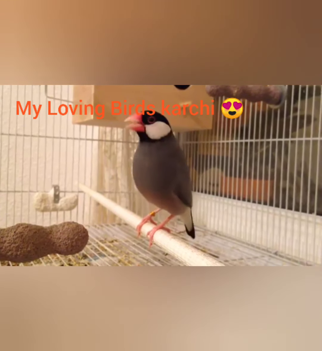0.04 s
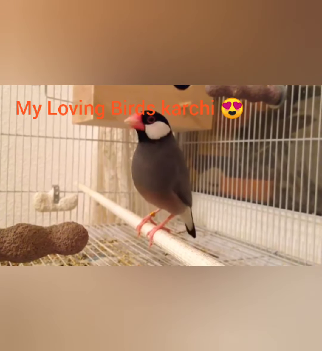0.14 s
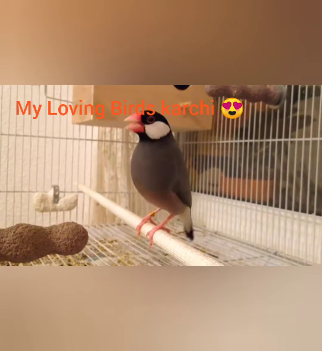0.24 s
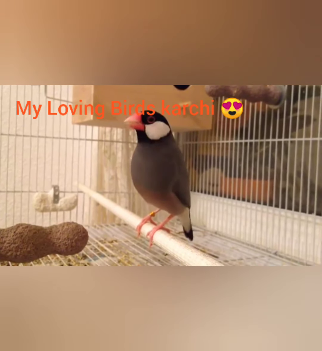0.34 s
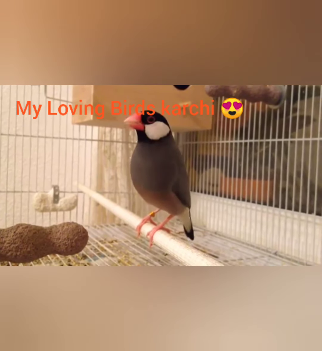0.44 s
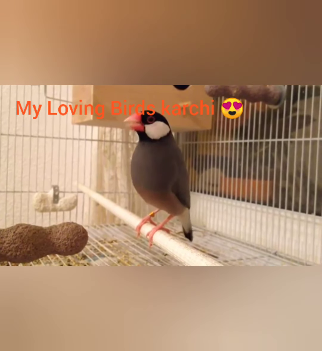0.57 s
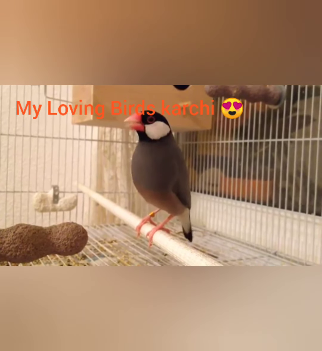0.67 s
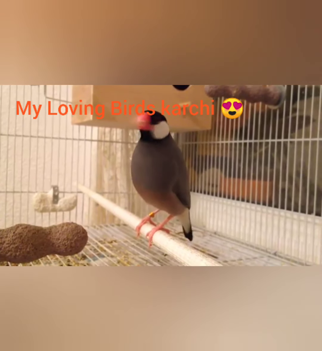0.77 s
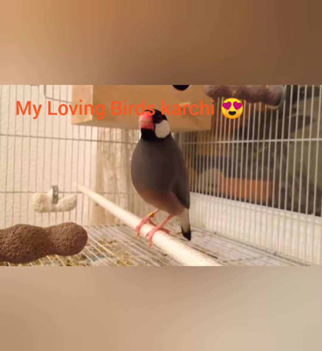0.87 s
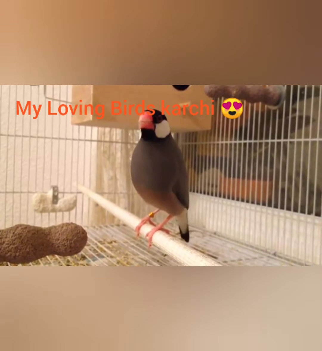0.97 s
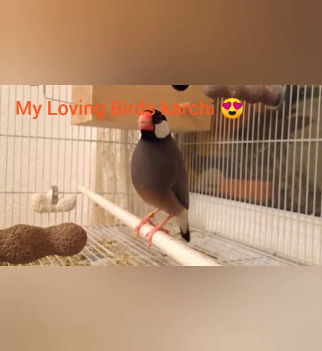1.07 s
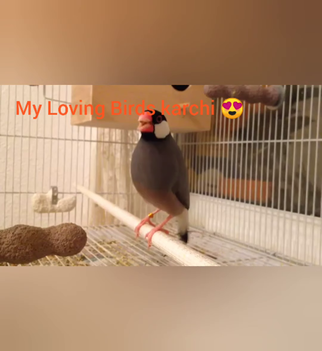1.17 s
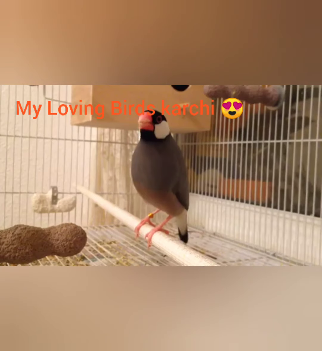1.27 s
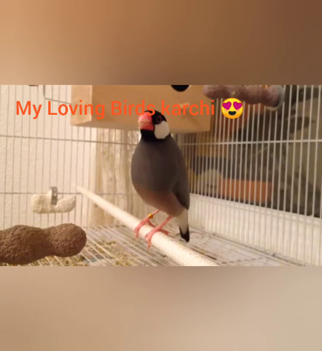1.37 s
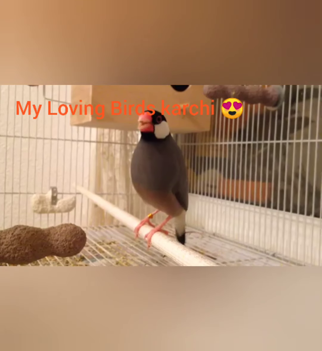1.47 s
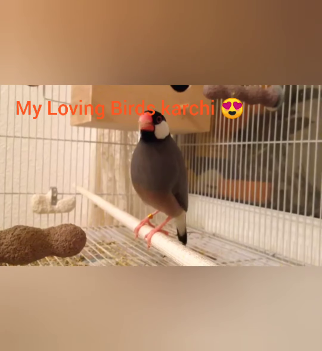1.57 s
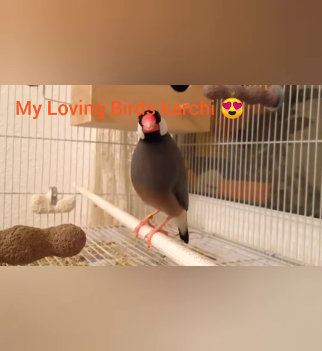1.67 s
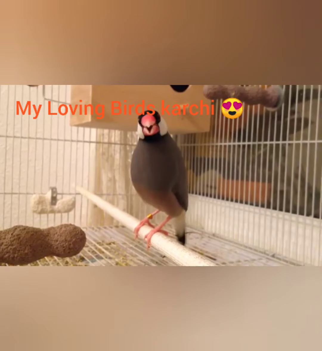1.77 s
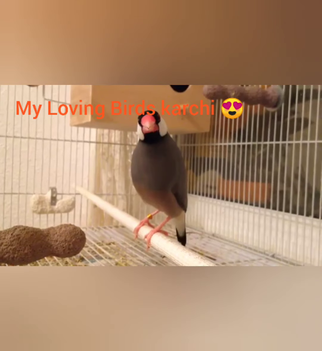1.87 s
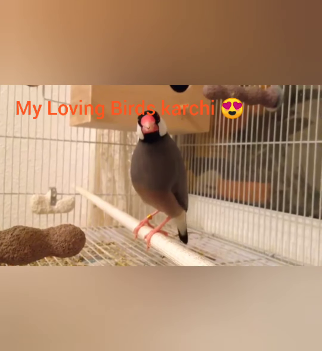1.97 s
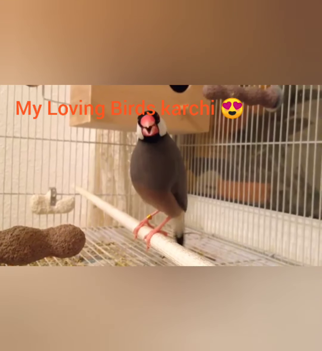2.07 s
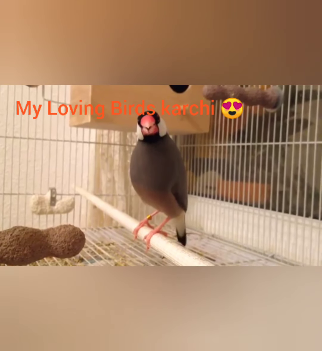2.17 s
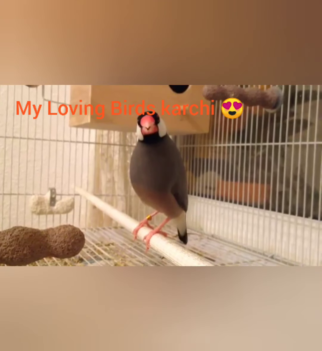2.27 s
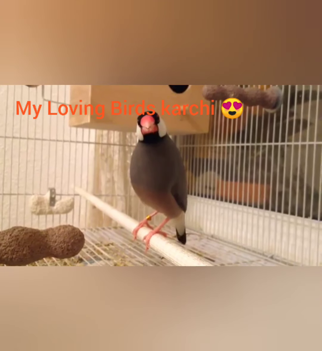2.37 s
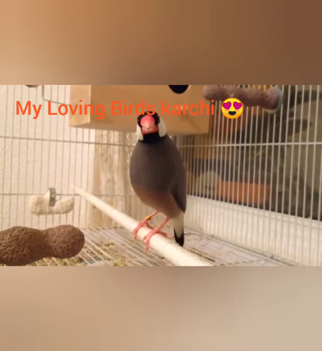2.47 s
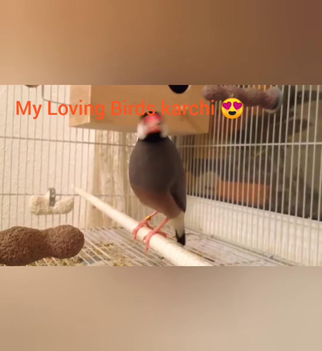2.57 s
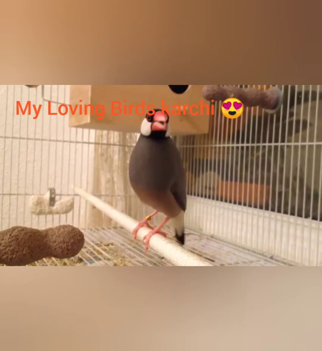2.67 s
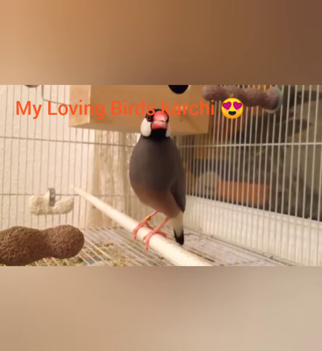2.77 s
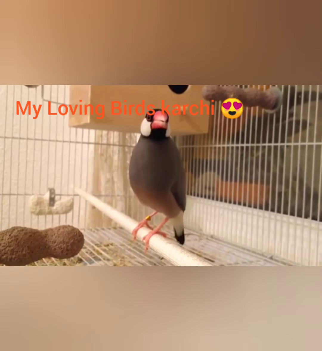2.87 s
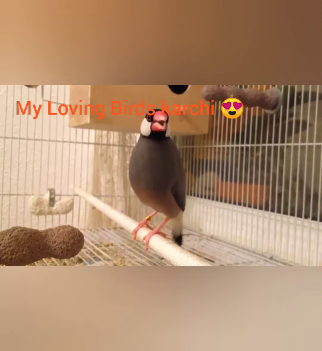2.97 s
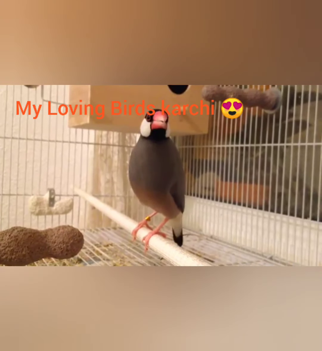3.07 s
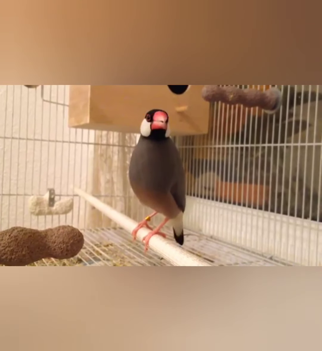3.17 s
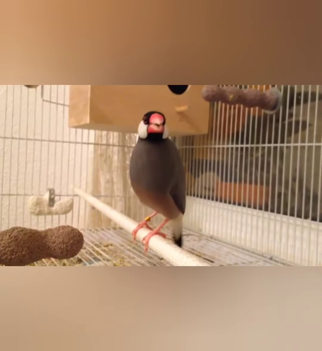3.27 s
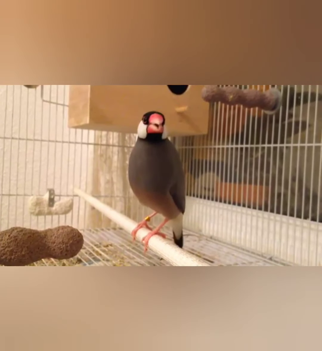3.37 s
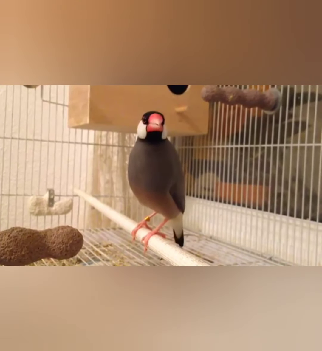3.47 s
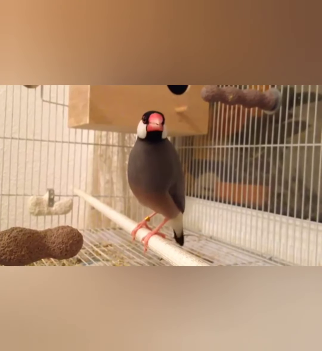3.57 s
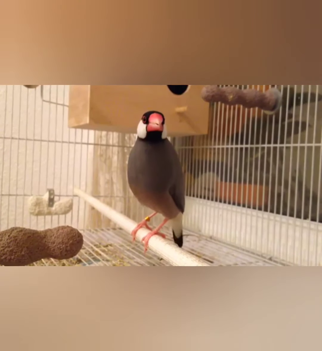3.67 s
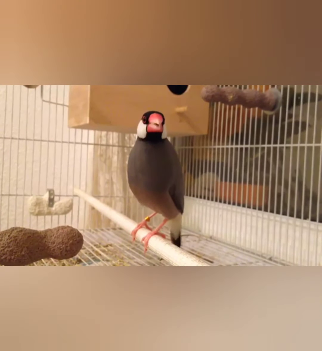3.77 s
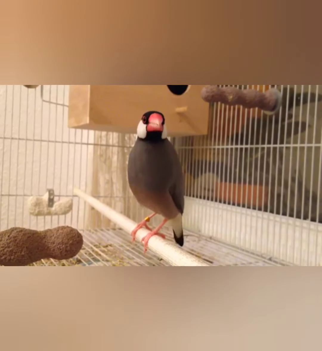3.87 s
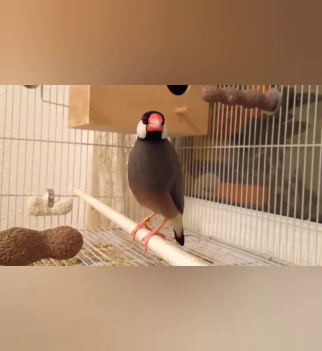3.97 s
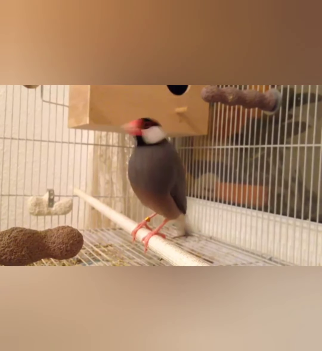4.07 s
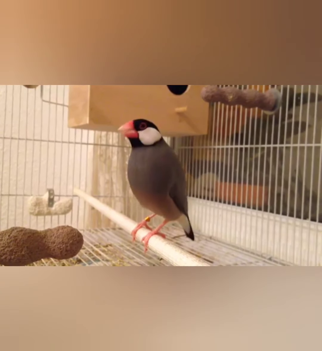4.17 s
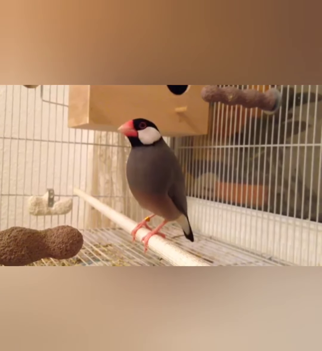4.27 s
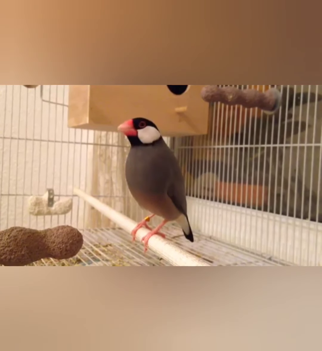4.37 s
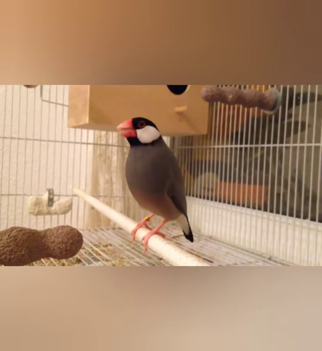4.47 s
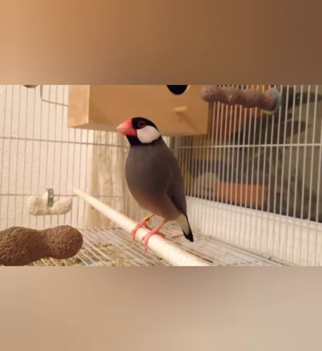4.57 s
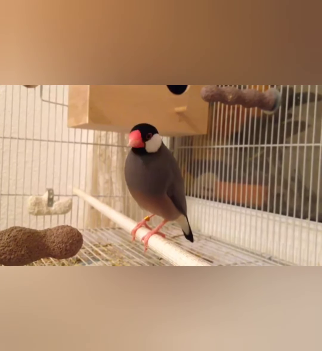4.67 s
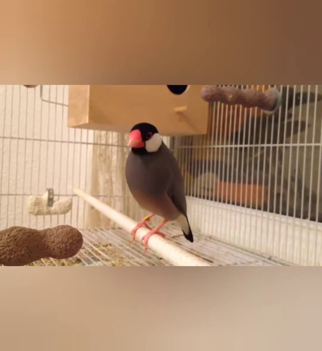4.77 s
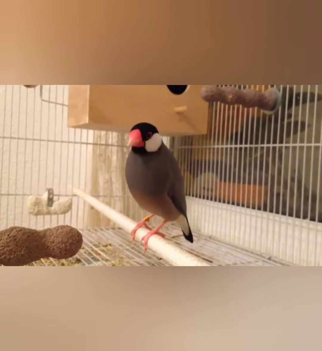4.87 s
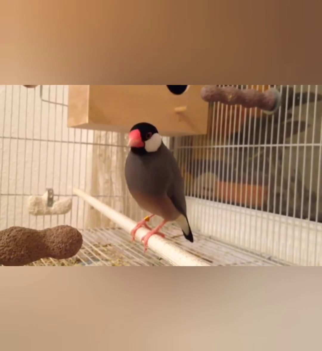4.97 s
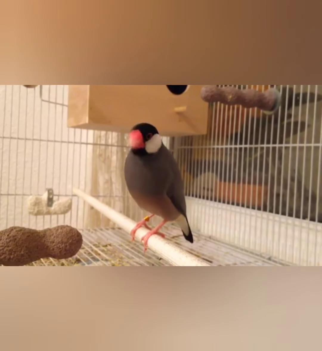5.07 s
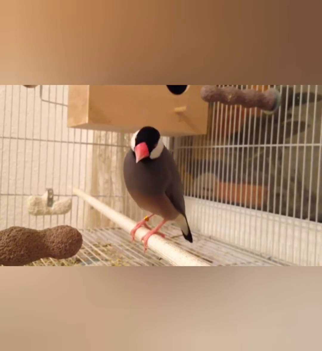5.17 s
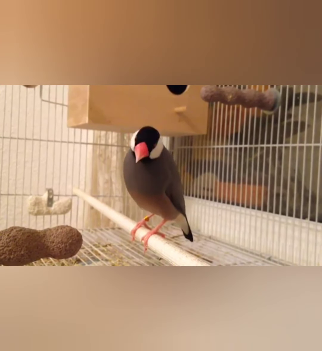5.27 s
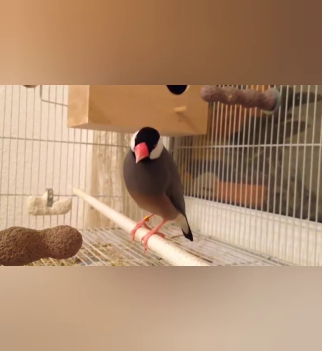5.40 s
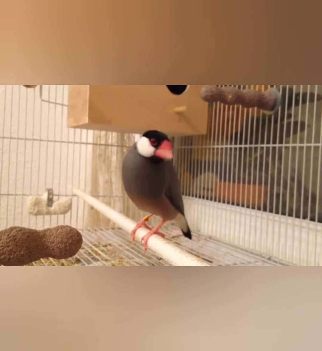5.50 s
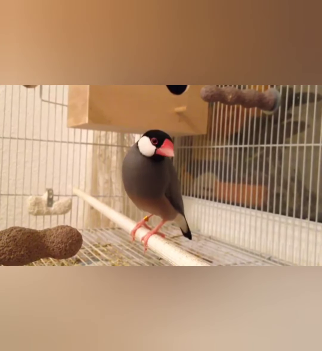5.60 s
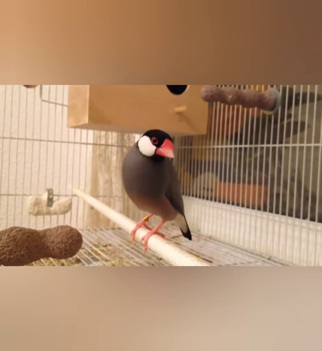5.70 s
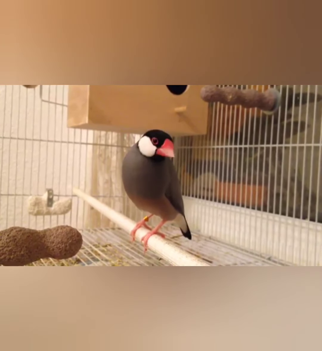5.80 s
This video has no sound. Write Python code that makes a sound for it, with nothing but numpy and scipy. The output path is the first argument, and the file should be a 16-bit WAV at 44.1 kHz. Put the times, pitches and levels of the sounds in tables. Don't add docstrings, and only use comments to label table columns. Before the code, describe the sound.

A small caged finch sings near a phone microphone in a bare room, its thin, nearly pure notes ringing on briefly. The tail of an earlier peep hangs at the very start. Chirps dive steeply at 0.1 and 0.35 seconds, each ending in a tiny breathy rattle and followed by a soft low cluck. A piercing held note comes at 0.6, a faint tumbling rattle at 0.74, a snappy chip at 0.9, then a quiet rising whistle and a bright peep at 1.1. The second phrase has three chirps from 1.27 to 1.85, a held note at 2.1, and chip, whistle and peep by 2.6. The third has chirps at 2.8 and 3.05, its loudest held note at 3.3, and a final whistle and peep around 3.8. Song then stops; steady hiss and faint low hum remain, with barely audible ticks near 4.2, 4.5 and 5.1.

```python
import sys
import numpy as np
from scipy import signal
from scipy.io import wavfile
from scipy.ndimage import uniform_filter1d

SR = 44100
rng = np.random.default_rng(int(sys.argv[2]) if len(sys.argv) > 2 else 0)


def generate_wav(sig):
    pcm = np.round(np.clip(np.atleast_2d(sig).T, -1, 1) * 32767).astype(np.int16)
    wavfile.write(sys.argv[1], SR, pcm)


def undo_db(level):
    steps = np.asarray(level, float) / 20
    return 10 ** steps


N = 257544
BEFORE = SR // 4


def evened(x):
    return x / np.sqrt(np.mean(x ** 2) + 1e-20)


def read(points, hz, column=1):
    table = np.transpose(points)
    return np.interp(np.log(hz + 1), np.log(table[0] + 1), table[column])


def add(mix, s, sound):
    part = mix[BEFORE + round(s * SR):][:len(sound)]
    part += sound[:len(part)]


def wobble(count, seconds):
    size = max(round(seconds * SR), 1)
    once = uniform_filter1d(rng.standard_normal(count), size)
    return evened(uniform_filter1d(once, size))


# [pitch_hz, second_db, third_db]
OVERTONES = [(2800, -43, -80), (3250, -42.5, -79), (3940, -51.5, -81.5), (3796, -44.5, -69),
             (4155, -39.5, -65.5), (4600, -38, -50), (5150, -33.5, -58)]
WARBLE_PER_S, WARBLE_DEPTH = 95, 0.023
DULL_HZ = 4000


def voice(rows, dull_hz=0):
    s, hz, level_db = np.transpose(rows)
    t = np.arange(s[0], s[-1], 1 / SR)
    hz = np.interp(t, s, hz) * (1 + .005 * wobble(len(t), .002))
    strain = np.clip((hz - 4650) / 300, 0, 1)
    hz *= 1 + WARBLE_DEPTH * strain * np.sin(2 * np.pi * WARBLE_PER_S * (t - s[0]))

    level_db = 20 * np.log10(uniform_filter1d(np.interp(t, s, undo_db(level_db)), size=60))
    level_db += 3.0 * strain * wobble(len(t), 0.0013)
    turn = 2 * np.pi * np.cumsum(hz) / SR
    second = undo_db(read(OVERTONES, hz, column=1)) * np.sin(2 * turn)
    third = undo_db(read(OVERTONES, hz, column=2)) * np.sin(3 * turn)
    unsteady = 1 + .35 * wobble(len(t), .0008)
    overtones = (second + third) * unsteady / (1 + (dull_hz / hz) ** 30)
    air = undo_db(-50) * (0.84 + strain) * wobble(len(t), 5 / SR) * np.cos(turn)
    tone = undo_db(level_db) * np.sin(turn) + undo_db(0.6 * level_db) * (overtones + air)
    return s[0], tone * signal.windows.tukey(len(t), .05)


SCOOP_S, SCOOP_DEPTH, LULL_S, LULL_DB = .006, .2, .022, -12
CLIMB, SWELL_SHARE, OVERSHOOT, WAVER_DB = .185, .8, .025, 3.5
# [start_s, length_s, pitch_hz, level_db]
WHISTLES = [
    (-.21, 0.13, 2850, -31),
    (0.981, .108, 2780, -36),
    (2.486, 0.1053, 2850, -30.5),
    (3.713, .108, 2836, -34),
]


def whistle(s, length, hz, level_db):
    t = np.linspace(0, length, num=30)
    climb = np.maximum(t - LULL_S, 0) / (length - LULL_S)
    scoop = SCOOP_DEPTH * np.maximum(1 - t / SCOOP_S, 0)
    overshoot = OVERSHOOT * np.exp(-((t - SCOOP_S) / SCOOP_S) ** 2)
    pitch = 1 - scoop + CLIMB * np.sin(climb * np.pi / 2.4) + overshoot
    corners_s = [0, SCOOP_S, LULL_S, SWELL_SHARE * length, length - SCOOP_S, length]
    effort_db = np.interp(t, corners_s, [-20, 0, LULL_DB, 0, 0, -20])
    effort_db += WAVER_DB * wobble(len(t), 2 / SR)
    return [voice(np.c_[s + t, hz * pitch, level_db + effort_db])]


JUMP_S, JUMP_DEPTH, JUMP_DB = .004, .08, -16.5
PEEP_S, SAG_HZ_PER_S, RELEASE_S = 0.028, 6000, .003
# [start_s, level_db, pitch_hz, attack_s, fade_db]
PEEPS = [
    (-.1, -9, 3780, 0.0085, -0.5),
    (1.097, -11.5, 3665, .004, -30),
    (2.594, -9, 3867, .009, -12.5),
    (3.822, -10.5, 3836, 0.0051, -5),
]


def peep(s, level_db, hz, attack, fade_db):
    t = np.array([-JUMP_S, 0, attack / 2, attack, PEEP_S, PEEP_S + RELEASE_S])
    below = JUMP_DEPTH * np.clip((attack / 2 - t) / (attack / 2 + JUMP_S), 0, 1)
    pitch_hz = hz * (1 - below) - SAG_HZ_PER_S * np.maximum(t - attack, 0)
    effort_db = np.array([2 * JUMP_DB, JUMP_DB, -3.0, 0, fade_db, 2 * JUMP_DB])
    return [voice(np.c_[s + t, pitch_hz, level_db + effort_db])]


CUT_HZ, CUT_DB_PER_OCTAVE, RUMBLE_DB = 140, -47.5, -39.5
HISS_DB = -62.5
# [frequency_hz, density_db_per_hz]
HISS = [(135, -1.5), (230, -3), (430, -8), (1500, -21), (4000, -29.5), (8000, -32.5), (10500, -39.5),
        (13500, -33)]


def hiss():
    frames, hz = N // 512 + 5, np.fft.rfftfreq(2048, 1 / SR)
    a, b, patches = rng.standard_normal((frames, 1025, 3)).T
    patches = uniform_filter1d(uniform_filter1d(patches, size=20, axis=0), size=8, axis=1)
    octaves_below = np.log2(np.maximum(CUT_HZ / (hz + 1), 1))
    bass_db = np.maximum(CUT_DB_PER_OCTAVE * octaves_below, RUMBLE_DB)
    gain = undo_db(read(HISS, hz) + bass_db)
    z = (a + 1j * b) * gain[:, None] * undo_db(.4 * evened(patches))
    share = np.sqrt(np.sum(gain ** 2) / np.sum(gain[hz > 220] ** 2))
    noise = signal.istft(z, nperseg=2048, noverlap=1536)[1][:N]
    return undo_db(HISS_DB) * share * evened(noise)


# [frequency_hz, width_hz, level_db, steadiness]
HUM = [
    (97.5, 1.7, -77, 6.4),
    (194.4, 2, -65, 1.1),
    (6650, 36, -93, 1.2),
]


def hum():
    t = np.arange(N) / SR
    out = np.zeros(N)
    for hz, width, level_db, steady in HUM:
        drift = steady + wobble(N, 0.16 / width) + 1j * wobble(N, 0.16 / width)
        out += undo_db(level_db) * evened((drift * np.exp(2j * np.pi * hz * t)).real)
    return out


def rattle(first, last, rate, first_hz, last_hz, level_db, grit=.045, tilt_db=0, bend=1.1, air=.15, sharp=3.0):
    t = np.arange(-.5 / rate, last - first + .5 / rate, 1 / SR)
    sunk = (1 - np.exp(-bend * t / (last - first))) / (1 - np.exp(-bend))
    hz = first_hz * (last_hz / first_hz) ** sunk
    level_db = level_db + tilt_db * np.log2(hz / last_hz)
    hz *= 1 - 0.03 * np.sin(2 * np.pi * rate * t) + grit * wobble(len(t), 0.0017)
    sizes = undo_db(1.5 * rng.standard_normal(12))[np.round(t * rate).astype(int) % 12]
    puffs = sizes * abs(np.cos(np.pi * rate * t)) ** sharp * signal.windows.tukey(len(t), .15)
    puffs *= 1 + air * wobble(len(t), .0009)
    return first + t[0], undo_db(level_db) * puffs * np.sin(2 * np.pi * np.cumsum(hz) / SR)


LEAD_S, LEAD_HZ, LEAD_FLAT, LEAD_FIRST_DB, LEAD_LAST_DB = .027, 5182, .97, -29, -15.5
DIVE_HZ_PER_S = 104300
RATTLE_AFTER_S, RATTLE_S, RATTLE_PER_S, RATTLE_FIRST_HZ, RATTLE_DB = .0225, .031, 175, 2850, -28
# [after_dive_start_s, level_db]
DIVE = [(.002, -13), (.0045, -3.5), (.0095, 0), (.012, -4), (.0135, -12), (.020, -28)]
# [dive_start_s, level_db, pitch_factor, dive_stretch, rattle_end_hz]
CHIRPS = [
    (.103, -11, 0.98, 1.02, 2387),
    (.354, -10, 0.98, 1.08, 2180),
    (1.265, -10, 0.97, 0.91, 2392),
    (1.523, -10, 0.98, .95, 2190),
    (1.852, -10.5, 0.98, 1.01, 2270),
    (2.781, -11.5, 0.98, 1.11, 2350),
    (3.059, -10, 0.96, 1.07, 2154),
]


def chirp(s, level_db, pitch, stretch, last_hz):
    after, dive_db = np.transpose(DIVE)
    t = np.r_[-LEAD_S, .002 - LEAD_S, 0, stretch * after]
    hz = pitch * np.r_[.9 * LEAD_HZ, LEAD_FLAT * LEAD_HZ, LEAD_HZ, LEAD_HZ - DIVE_HZ_PER_S * after]
    effort_db = np.r_[LEAD_FIRST_DB - 10, LEAD_FIRST_DB, LEAD_LAST_DB, dive_db]
    first = s + RATTLE_AFTER_S
    return [voice(np.c_[s + t, hz, level_db + effort_db], dull_hz=DULL_HZ),
            rattle(first, first + RATTLE_S, RATTLE_PER_S, RATTLE_FIRST_HZ, last_hz, RATTLE_DB)]


# [start_s, level_db]
LEVEL_CLUCKS = [
    (.215, -41),
    (1.38, -39),
    (2.899, -38.5),
]
# [start_s, level_db]
FALLING_CLUCKS = [
    (.439, -41),
    (1.611, -36.5),
    (1.936, -39.5),
    (3.145, -37.5),
]
# [start_s, level_db]
RISING_CLUCKS = [
    (.971, -37.5),
    (2.4746, -34.5),
    (3.697, -34.5),
]
# (length s, first Hz, last Hz, second partial dB, clucks)
CLUCK_KINDS = [(.0125, 776.5, 833, -3.5, LEVEL_CLUCKS), (.0115, 1480, 1144.5, -19, FALLING_CLUCKS),
               (.011, 790, 1138, 5.7, RISING_CLUCKS)]


def cluck(s, length, first_hz, last_hz, level_db, second_db):
    u = np.arange(0, 1, 1 / (length * SR))
    turn = 2 * np.pi * np.cumsum(first_hz + (last_hz - first_hz) * np.tanh(3 * u)) / SR
    tone = np.sin(turn) + undo_db(second_db) * np.sin(2 * turn) + undo_db(-20) * np.sin(3 * turn)
    band = signal.butter(4, [.5 * 1250, 1.1 * 1250], "band", fs=SR, output="sos")
    air = evened(signal.sosfilt(band, rng.standard_normal(1000)))[-len(u):]
    return s, undo_db(level_db) * (tone + undo_db(-12) * air) * np.sin(np.pi * u ** .8) ** 2


SWELL_AFTER_S = .043
# [after_start_s, pitch_hz, effort_db]
HELD = [(0, 4600, -34.5), (.005, 4680, -28), (.012, 5075, -25.5), (.026, 4660, -10.5), (0.036, 4538, 1),
        (.041, 4600, -9), (.045, 4680, -8.5), (0.049, 4640, -13.5), (.054, 4600, -29.5)]
# [start_s, level_db, pitch_factor, second_swell_db]
HELDS = [
    (.592, -10, 0.9975, 1.5),
    (2.098, -11.5, 1.015, 8),
    (3.307, -7.5, 1.002, -4.5),
]


def held(s, level_db, pitch, swell_db):
    t, hz, effort_db = np.transpose(HELD)
    swell = swell_db * (t > SWELL_AFTER_S)
    return [voice(np.c_[s + t, pitch * hz, level_db + effort_db + swell])]


DRIP_S, DRIP_PER_S, DRIP_FIRST_HZ, DRIP_LAST_HZ = .034, 172, 4050, 1400
# [start_s, level_db]
DRIPS = [
    (0.7351, -40.5),
    (2.240, -38),
    (3.457, -42),
]


def drip(s, level_db):
    return [rattle(s, s + DRIP_S, DRIP_PER_S, DRIP_FIRST_HZ, DRIP_LAST_HZ, level_db,
                   grit=.07, tilt_db=-4.5, bend=.9, air=.5, sharp=5)]


# [start_s, level_db, centre_hz, width_hz]
TICKS = [(.886, -54, 7500, 6000), (1.097, -57, 7000, 7000), (2.597, -61, 9000, 9000),
         (2.215, -47, 7000, 1200), (2.3985, -52, 8000, 7000), (3.327, -42, 5900, 1500),
         (4.186, -60, 2300, 500), (3.609, -58, 6000, 3000), (3.824, -57, 8000, 8000),
         (4.185, -65, 11500, 5000), (4.505, -64, 11000, 6000), (5.135, -66, 11000, 6000)]


def tick(s, level_db, hz, width):
    burst = rng.standard_normal(300) * np.exp(-np.arange(300) / 40.)
    b, a = signal.iirpeak(hz, hz / width, SR)
    return s, undo_db(level_db) * 4 * signal.lfilter(b, a, signal.lfilter(b, a, burst))


# [after_opening_s, pitch_hz, effort_db]
CHIP = [(-.005, 5400, -46), (-.0025, 4750, -22), (-.001, 4350, -6), (.002, 4200, 0), (.005, 4200, -4),
        (.0065, 4050, -17), (.008, 3300, -16), (.010, 3000, -20), (.013, 2900, -42)]
# [start_s, level_db, pitch_factor, stretch]
CHIPS = [
    (0.89, -14, 0.99, 0.93),
    (2.392, -14.5, 1.035, 1.061),
    (3.6133, -14, 1.045, 0.75),
]


def chip(s, level_db, pitch, stretch):
    t, hz, effort_db = np.transpose(CHIP)
    return [voice(np.c_[s + stretch * t, pitch * hz, level_db + effort_db], dull_hz=DULL_HZ)]


def finch():
    song = np.zeros(N + BEFORE)
    notes = ((whistle, WHISTLES), (peep, PEEPS), (chirp, CHIRPS), (held, HELDS), (drip, DRIPS), (chip, CHIPS))
    for maker, rows in notes:
        for row in rows:
            for part in maker(*row):
                add(song, *part)
    for length, first_hz, last_hz, second_db, rows in CLUCK_KINDS:
        for s, level_db in rows:
            add(song, *cluck(s, length, first_hz, last_hz, level_db, second_db))
    for row in TICKS:
        add(song, *tick(*row))
    return song


# [delay_s, level_db]
WALLS = [(.0021, -22), (.0047, -20), (.0078, -22), (.0113, -21), (.0166, -22)]
# [frequency_hz, t60_s, level_db]
ROOM = [(500, .5, -11.5), (2000, 0.35, -11), (3220, 0.37, -9), (4240, 0.4, -17.5), (5970, .45, -5.5),
        (8700, 0.24, -7.5), (13975, 0.16, -12.5)]


def room(x):
    near = np.zeros(SR // 20)
    near[0] = 1
    for delay, level_db in WALLS:
        near[round(delay * SR)] += undo_db(level_db)
    taps = np.zeros(SR)
    at = np.arange(200, SR - 20, 20)
    taps[at + rng.integers(0, 20, len(at))] = rng.choice([-1., 1.], len(at))
    hz, t, z = signal.stft(taps, SR, nperseg=256)
    t60 = read(ROOM, hz)[:, None]
    wet_db = read(ROOM, hz, column=2)[:, None]
    swell = 1 - np.exp(-t / .006)
    energy = 2000 * t60 / (2 * np.log(1000))
    decay = undo_db(wet_db - 60 * t / t60) / np.sqrt(energy)
    tail = signal.istft(z * swell * decay, SR, nperseg=256)[1]
    return signal.fftconvolve(x, near)[:len(x)] + signal.fftconvolve(x, tail)[:len(x)]


def scene():
    return (room(finch())[BEFORE:] + hiss() + hum())[None]


def masked(x):
    hz, t, z = signal.stft(x, SR, nperseg=1024, noverlap=768)
    power = uniform_filter1d(uniform_filter1d(abs(z) ** 2, size=9, axis=0), size=5, axis=1) + 1e-20
    octaves = np.log2((hz[:, None] + 40) / (hz + 40))
    slope_db = np.where(octaves > 0, -18, 45)
    shadow = undo_db(-40 + slope_db * octaves) ** 2 @ power
    hidden = 1 / (1 + (power / np.minimum(shadow, undo_db(-95) ** 2)) ** 4)
    return signal.istft(z * undo_db(-25 * hidden), SR, nperseg=1024, noverlap=768)[1][:N]


def top_cut(x):
    return signal.sosfilt(signal.butter(12, 15730, fs=SR, output="sos"), x)


def record(dry):
    low_pass = signal.firwin(301, 15150, window=("kaiser", 6), fs=SR)
    cut = signal.oaconvolve(dry[0], low_pass, "same")
    return top_cut(masked(cut)[None])


dry = scene()
out = record(dry)
generate_wav(out)
```